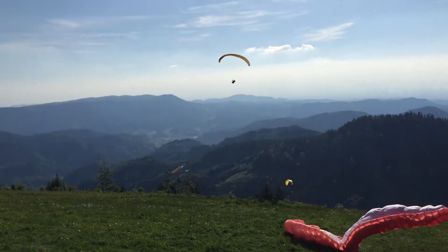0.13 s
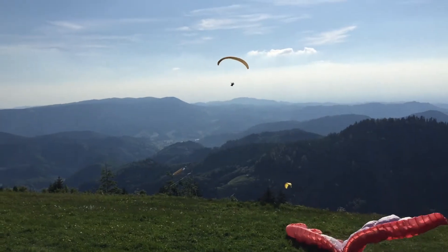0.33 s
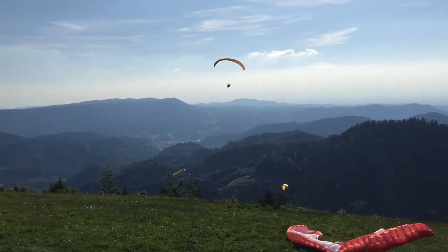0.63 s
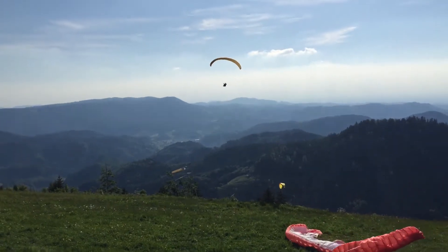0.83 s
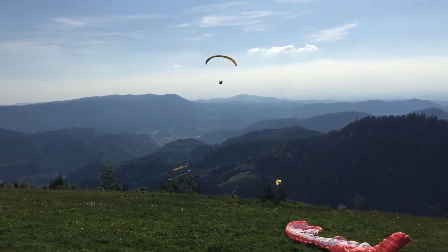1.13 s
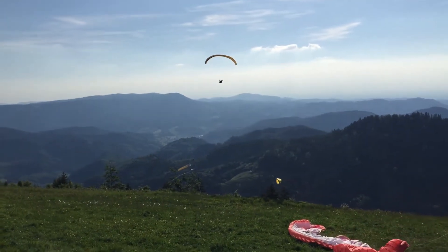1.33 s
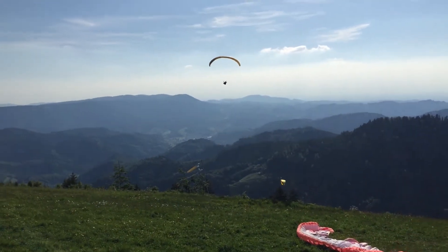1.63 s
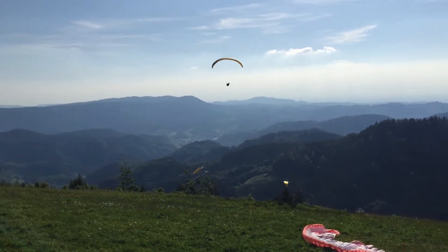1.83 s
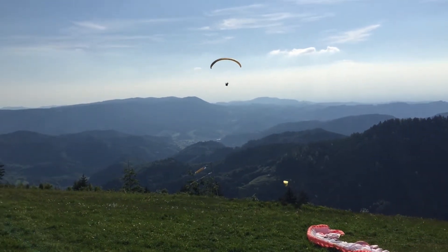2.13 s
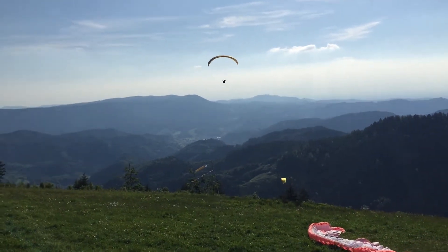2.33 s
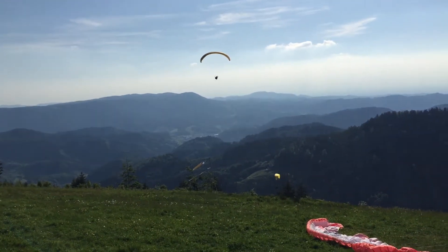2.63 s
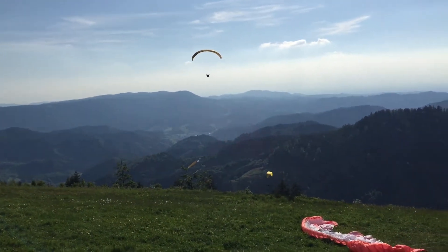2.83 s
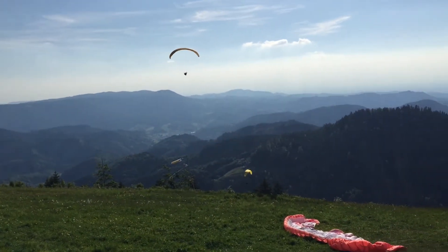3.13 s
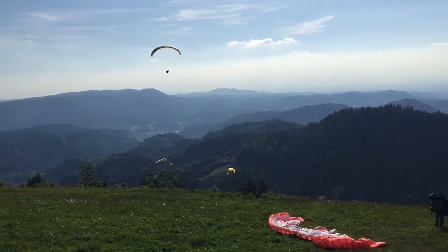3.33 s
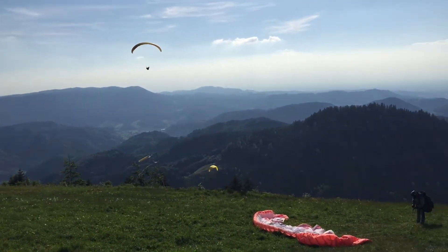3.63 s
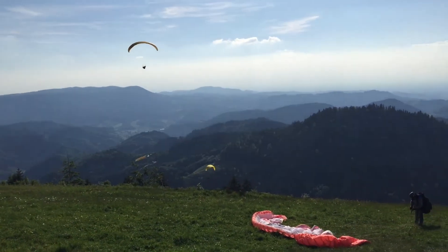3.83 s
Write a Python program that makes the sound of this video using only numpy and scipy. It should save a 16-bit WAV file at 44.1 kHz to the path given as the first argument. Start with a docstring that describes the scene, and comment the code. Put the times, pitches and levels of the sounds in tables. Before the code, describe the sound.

Wind thumps and rumbles on the microphone on an open hilltop while fabric rustles and a motor hum passes

```python
"""Windy hilltop with a motor passing

Wind on an open hilltop thumps the microphone: sine swells with falling pitch and noisy edges, over a noise rumble.
A fabric canopy rustles (patchy noise) over a faint steady hiss; soft taps of fabric and lines are noise puffs.
Something motor-driven passes: an air rush of noise swells and fades, with narrow whistles in it.
Its hum and thin whine, made of sines, drop in pitch as it passes; the hum rises a little again at the end."""
import sys
import numpy as np
from scipy import signal
from scipy.fft import rfft, irfft, next_fast_len
from scipy.io import wavfile
from scipy.ndimage import uniform_filter1d, map_coordinates

SR = 44100
rng = np.random.default_rng(int(sys.argv[2]) if len(sys.argv) > 2 else 0)


def persist_wave(psi):
    """Save psi, clipped to +-1, as 16-bit WAV."""
    counts = np.round(np.clip(psi, -1, 1) * 32767).astype(np.int16)
    wavfile.write(sys.argv[1], SR, np.atleast_2d(counts).T)


N = 176400  # samples, 4 s
UNSTEADY_DB, STREAK_DB = 1, 3  # typical size of gentle and of strong random level changes


def amp(db):
    """Turn decibels into a plain multiplier."""
    return 10 ** (np.asarray(db) / 20)


def unit(x):
    """Scale a sound to an average (rms) strength of 1."""
    return x / np.sqrt(np.mean(x ** 2) + 1e-20)


def white_noise():
    """Hiss with equal strength at all pitches, as long as the scene."""
    return rng.standard_normal(N)


def curves(rows):
    """One value per sample for each column after the time."""
    times, *columns = np.transpose(rows)
    return [np.interp(np.arange(N) / SR, times, column) for column in columns]


def wobble(rate):
    """A smooth random curve through `rate` random points a second."""
    knots = rng.standard_normal(int(N * rate / SR) + 4)
    return map_coordinates(knots, [np.arange(N) * rate / SR])


def filtered(x, response):
    """Multiply each frequency of x by response(frequency in Hz)."""
    size = next_fast_len(len(x) + 8192)
    spectrum = rfft(x, size) * response(np.fft.rfftfreq(size, 1 / SR))
    return irfft(spectrum, size)[:len(x)]


def coloured(x, points):
    """Shape x by a curve of (f/Hz, level/dB) points on a log pitch axis, then set its rms to 1."""
    f, db = np.transpose(points)

    def response(hz):
        return amp(np.interp(np.log(hz + 1), np.log(f + 1), db, -120, -120))
    return unit(filtered(x, response))


def patchy_noise(spectrum, patchy_db, size=(2, 10)):
    """Noise of rms 1 with random loud and soft patches; size counts steps of (43 Hz, 12 ms)."""
    grid = signal.stft(rng.standard_normal(N + 2048), nperseg=1024)[2]
    across_pitch = uniform_filter1d(rng.standard_normal(grid.shape), size[0], 0)
    patches = unit(uniform_filter1d(across_pitch, size[1], 1))
    noise = signal.istft(grid * amp(patchy_db * patches), nperseg=1024)[1]
    return coloured(noise, spectrum)[:N]


def add(out, s, piece):
    """Mix a piece into out, starting at s seconds."""
    part = out[max(round(s * SR), 0):][:len(piece)]
    part += piece[:len(part)]


def puff(length_s):
    """Times, and a swell that rises quickly to 1 and fades more slowly over three lengths."""
    t = np.arange(round(3 * length_s * SR)) / SR
    u = 4.55 * t / length_s
    return t, u * u * np.exp(2 - u) / 4


def burst(swell, noise):
    """Noise under a swell, with the energy of the swell alone."""
    shaped = swell * noise
    return shaped * np.linalg.norm(swell) / np.linalg.norm(shaped)


# Colour of the faint steady hiss: f/Hz, relative level/dB
FAR_HISS = [(5000, -5), (9000, -8), (10400, -11.5), (12000, -8), (15300, -16)]


def far_hiss():
    """Far wind is a steady, faint, high noise."""
    return amp(-74.5) * coloured(white_noise(), FAR_HISS)


# Strength of the deep part of the rumble over time: t/s, level/dB
RUMBLE_LEVEL = [(0, -21), (.42, -36), (.5, -43), (.75, -38), (1.6, -42), (1.8, -31.5), (2.05, -38.5),
                (3.2, -39), (3.5, -32), (4, -31.5)]
# Colour of the deep part: f/Hz, relative level/dB
DEEP_COLOUR = [(20, -54.5), (48, 1), (95, 0), (140, -16), (260, -49)]
# Colour of the upper, fluttering part: f/Hz, relative level/dB
FLUTTER_COLOUR = [(70, -14.5), (130, 2.5), (200, -6.5), (520, -36)]


def lumpy_noise(depth_db, colour):
    """Noise of rms 1 whose loudness swings at random, 25 random points a second."""
    lumps = amp(depth_db * wobble(25))
    return unit(lumps * coloured(white_noise(), colour))


def wind_rumble():
    """The wind's low noise: a deep part and an upper part, each lumping on its own."""
    level_db, = curves(RUMBLE_LEVEL)
    deep = lumpy_noise(3, DEEP_COLOUR)
    flutter = amp(-2) * lumpy_noise(6, FLUTTER_COLOUR)
    return amp(level_db) * (deep + flutter)


# Strength of the rustle, before its small random changes: t/s, level/dB
RUSTLE_LEVEL = [(0, -52.5), (.55, -57), (.8, -52.5), (1.08, -58.5), (1.2, -52.5), (1.4, -57), (1.85, -54.5),
                (2.2, -59), (3.4, -57), (3.75, -60.5), (4, -68.5)]
# Colour of the rustle: f/Hz, relative level/dB
RUSTLE_COLOUR = [(250, -15), (700, -15), (1850, -16), (2480, -20.5), (2970, -28), (3200, -20.5),
                 (4400, -23), (5100, -33.5), (9000, -44)]


def canopy():
    """Rustling fabric is noise in small patches of pitch and time, a little unsteady in level."""
    level_db, = curves(RUSTLE_LEVEL)
    unsteady_db = level_db + UNSTEADY_DB * wobble(13.27)
    return amp(unsteady_db) * patchy_noise(RUSTLE_COLOUR, patchy_db=4, size=(3, 5))


# Soft taps: t/s, level/dB of the swell's peak, f/Hz, length/s (fades over three),
# pitch spread (as a share of f)
TAPS = [(1.522, -42, 790, 0.0077, 0.42), (1.653, -40.5, 386, 0.02, 0.039), (0.049, -52, 2440, 0.029, 0.018),
        (3.351, -45, 1340, 0.066, 0.22), (3.396, -39.5, 1046, 0.02, 0.036), (3.653, -50, 1590, 0.028, 0.36)]


def taps():
    """Soft taps of fabric and lines: short puffs of noise around a pitch."""
    out = np.zeros(N)
    for s, db, hz, length_s, spread in TAPS:
        t, swell = puff(length_s)

        def band(f):
            return np.exp(-(np.log((f + 1) / hz) / spread) ** 2 / 2)
        noise = unit(filtered(rng.standard_normal(4096), band))
        add(out, s, amp(db) * burst(swell[:4096], noise[:len(t)]))
    return out


# Centres of the narrow whistles in the rush: f/Hz
WHISTLES_HZ = [3083, 3163, 3290]


def whistle():
    """Air noise in a few narrow resonances, each wavering on its own."""
    width_hz = 57

    def ring(hz):
        return filtered(white_noise(), lambda f: 1 / (1 + (2 * (f - hz) / width_hz) ** 2))
    return unit(sum(amp(STREAK_DB * wobble(5.19)) * ring(hz) for hz in WHISTLES_HZ))


# The passing rush: t/s, level/dB before small random changes, treble change/dB,
# whistle/dB relative to the air noise
RUSH = [(2.02, -64, -24.5, 0), (2.4, -55.5, 1.5, -6.5), (2.62, -48.5, 2.5, -2), (2.77, -44, 2.5, -3),
        (2.98, -43, 5.5, -6), (3.08, -43, -5.5, -9), (3.2, -44.5, 2.5, 1), (3.31, -44.5, -2.5, -0.5),
        (3.39, -44, -2.5, -2.5), (3.47, -50, -4.5, 3), (3.56, -56.5, 1, -4.5), (3.72, -54, -7.5, -11),
        (3.85, -67, 3, -5), (4.0, -58, -4.5, 3.5)]
# Colour of the air while coming: f/Hz, relative level/dB
COMING = [(230, -4), (1500, -9), (2700, -14), (3300, -7), (4800, -16), (6000, -9.5), (7400, -21.5),
          (10300, -37.5), (12300, -34.5), (15300, -48.5)]
# Colour of the air while going: f/Hz, relative level/dB
GOING = [(230, -0.5), (1500, -16.5), (2200, -7.5), (3500, -7), (5400, -9.5), (6200, -20), (8300, -15.5),
         (10200, -31), (12100, -26.5), (15300, -36)]


def passing_rush():
    """Streaky air noise that swells and fades, turning from one colour to another as it goes by."""
    turn_s, turn_takes_s, treble_from_hz = 3.03, .1, 6800
    level_db, treble_db, whistle_db = curves(RUSH)
    t = np.arange(N) / SR
    going = (1 + np.tanh((t - turn_s) / turn_takes_s)) / 2  # 0 to 1
    air = np.sqrt(1 - going) * patchy_noise(COMING, patchy_db=3.5)
    air = air + np.sqrt(going) * patchy_noise(GOING, patchy_db=2.0)
    treble = filtered(air, lambda hz: 1 / (1 + (treble_from_hz / (hz + 1)) ** 8))
    air = air + (amp(treble_db) - 1) * treble + amp(whistle_db) * whistle()
    started = np.arange(N) > RUSH[0][0] * SR
    return started * amp(level_db + UNSTEADY_DB / 2 * wobble(14)) * air


# The hum, before small random changes: t/s, f/Hz, level/dB
HUM = [(2.2, 151.3, -62.5), (2.75, 149.4, -34.5), (3.35, 146.9, -27.5), (3.75, 145.6, -29),
       (3.86, 148, -47), (4.0, 149.7, -27.5)]
# Overtones of the hum: multiple of its pitch, level/dB relative to it before random changes
OVERTONES = [(2, -24), (6, -40.5), (8, -43)]
# The thin whine, before random changes: t/s, f/Hz, level/dB
WHINE = [(1.9, 784, -73.5), (2.8, 781, -52.5), (2.9, 778, -68), (3.2, 730, -62), (3.35, 717, -55.5),
         (4.0, 700, -70)]


def motor():
    """A hum with weak overtones and a whine made fuzzy by fast random pitch changes."""
    hum_hz, hum_db = curves(HUM)
    whine_hz, whine_db = curves(WHINE)
    phase = 2 * np.pi * np.cumsum(hum_hz + 0.17 * wobble(4.8)) / SR
    overtones = sum(amp(db + STREAK_DB * wobble(4.3)) * np.sin(k * phase) for k, db in OVERTONES)
    hum = amp(hum_db + UNSTEADY_DB * wobble(10)) * (np.sin(phase) + overtones)
    whine_phase = 2 * np.pi * np.cumsum(whine_hz + 7 * wobble(40)) / SR
    whine = amp(whine_db + STREAK_DB * wobble(29.96)) * np.sin(whine_phase)
    started = np.arange(N) > HUM[0][0] * SR
    return np.sqrt(2) * started * (hum + whine)  # a sine's peak is sqrt(2) times its rms


# Buffets: t/s, level/dB of the swell's peak, middle f/Hz of the falling pitch,
# edge level/dB relative to the thump, length/s (fades over three)
BUFFETS = [(0.043, -19.5, 107.3, -10.5, 0.037), (0.093, -16, 158, -17, 0.046),
           (0.152, -11.5, 194.3, -7, 0.018), (0.187, -18.5, 120, -14, 0.035),
           (0.285, -20.5, 105.6, -43, 0.0684), (0.314, -16, 144.7, -22, 0.033),
           (0.394, -19.5, 89, -18.5, 0.04), (0.821, -17, 133, -20, 0.027), (0.841, -15, 97.5, -19.5, 0.017),
           (0.949, -17, 119, -11, 0.019), (1.087, -20.5, 141, -15.5, 0.025),
           (1.133, -29.5, 162, -8.5, 0.017), (1.329, -24.5, 152.7, -2.5, 0.047),
           (1.811, -15, 126.3, -9, 0.0432), (1.936, -16, 102, -27, 0.022), (2.131, -23.5, 85, -37, 0.029),
           (2.396, -23.5, 73, -11.5, 0.015), (2.597, -23, 101, -22, 0.014), (3.353, -24.5, 140, -4, 0.023),
           (3.412, -22, 113, -17, 0.017), (3.459, -23.5, 154.4, -4.5, 0.05), (3.769, -19, 146, -20, 0.049),
           (3.803, -15, 180, -17, 0.021)]
# Colour of the noisy edge: f/Hz, relative level/dB
EDGE_COLOUR = [(120, -12), (250, 0), (480, -19), (750, -30), (950, -50)]


def wind_buffets():
    """Wind thumps the microphone: a few low cycles of sagging pitch, with a brighter noisy edge."""
    sag, edge_length_s = 0.62, .016  # sag: pitch falls by up to this share of the middle pitch
    out = np.zeros(N)
    edge_noise = coloured(white_noise(), EDGE_COLOUR)
    for s, db, hz, edge_db, length_s in BUFFETS:
        t, swell = puff(length_s)
        pitch_hz = hz * (1 + sag * np.exp(-t / length_s) - sag / 2)
        turn = rng.uniform(0, 1)  # where in its cycle the thump starts
        thump = swell * np.sin(2 * np.pi * (turn + np.cumsum(pitch_hz) / SR))
        add(out, s - .004, amp(db) * thump)
        snap = puff(edge_length_s)[1]
        edge = burst(snap, edge_noise[round(s * SR):][:len(snap)])
        add(out, s - .002, amp(db + edge_db) * edge)
    return out


def scene():
    """All the layers together, from the background to the buffets."""
    background = far_hiss() + wind_rumble() + canopy() + taps()
    passing = passing_rush() + motor()
    return (background + passing + wind_buffets())[None]


def record(dry):
    """Fade both ends over 100 samples and keep nothing from 15250 Hz up."""
    from_ends = np.minimum(np.arange(N), np.arange(N)[::-1])
    fade = np.clip(from_ends / 100, 0, 1)
    return filtered(dry[0] * fade, lambda hz: hz < 15250)[None]


dry = scene()
out = record(dry)
persist_wave(out)
```